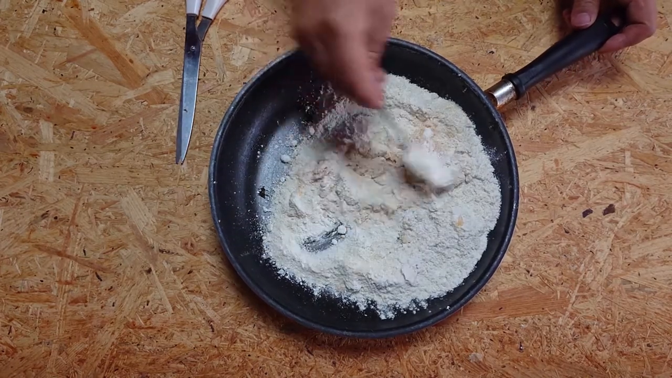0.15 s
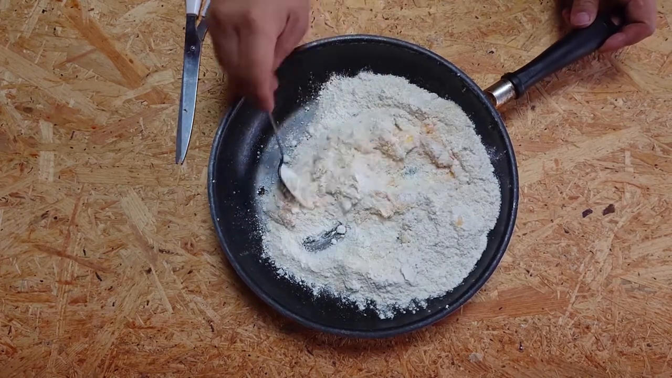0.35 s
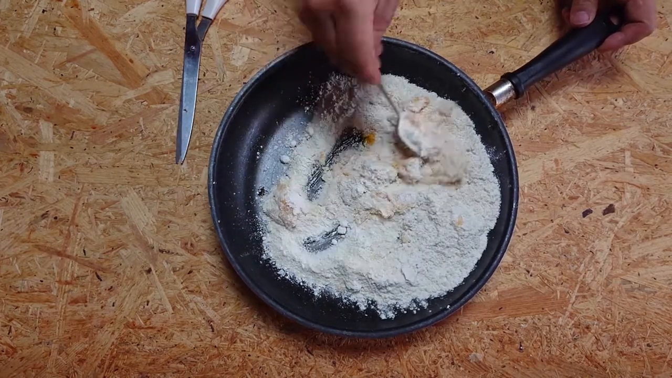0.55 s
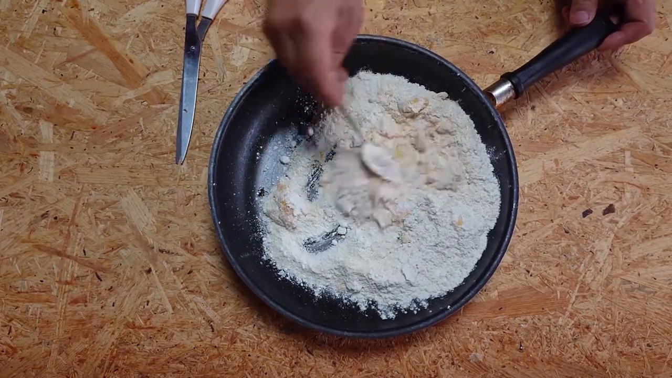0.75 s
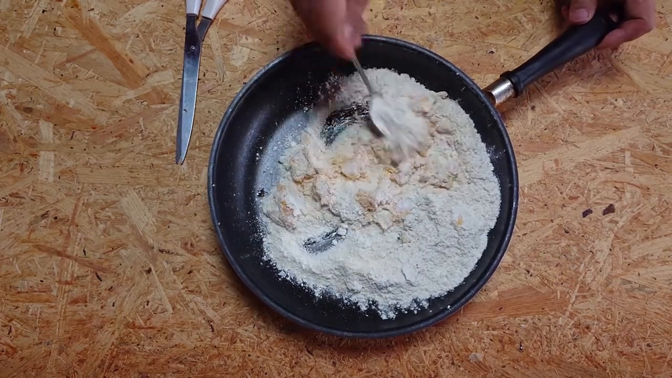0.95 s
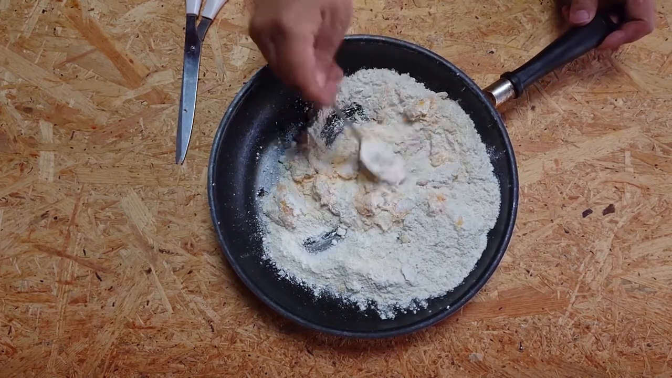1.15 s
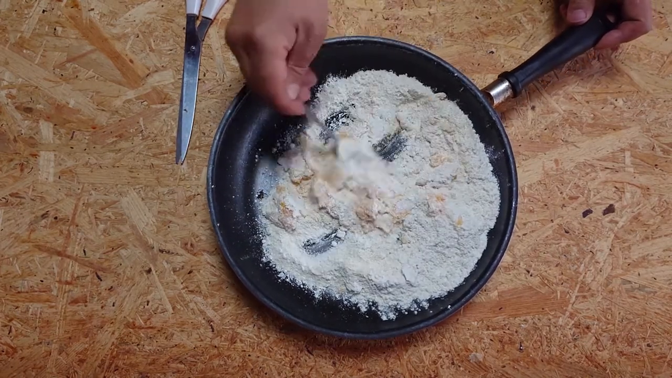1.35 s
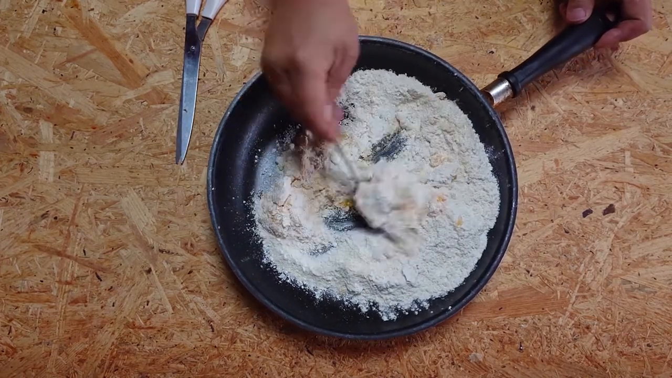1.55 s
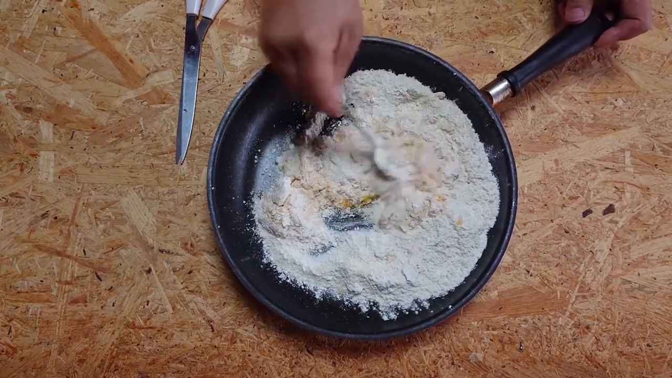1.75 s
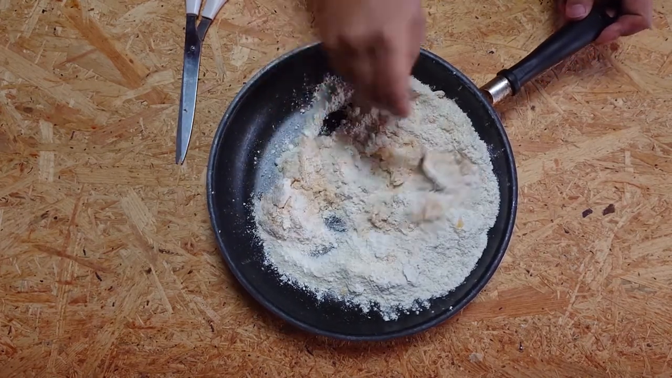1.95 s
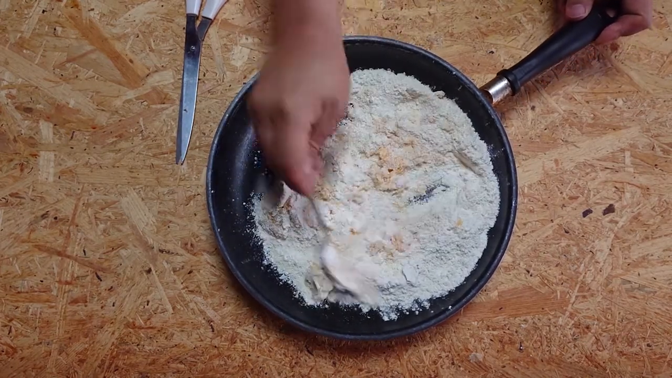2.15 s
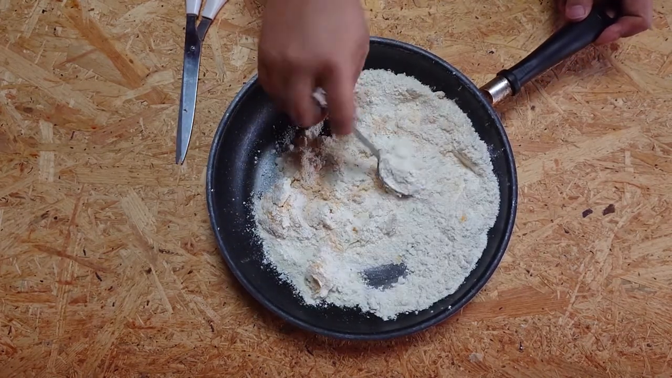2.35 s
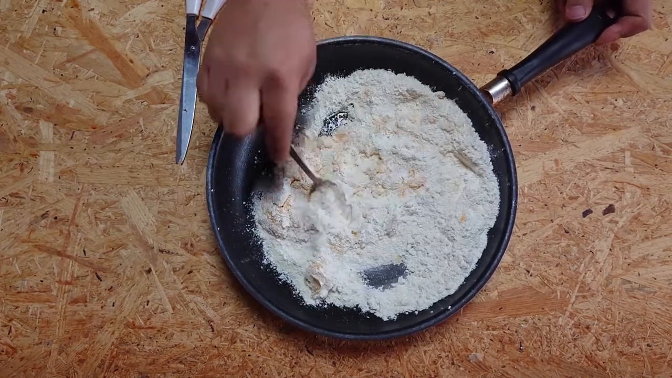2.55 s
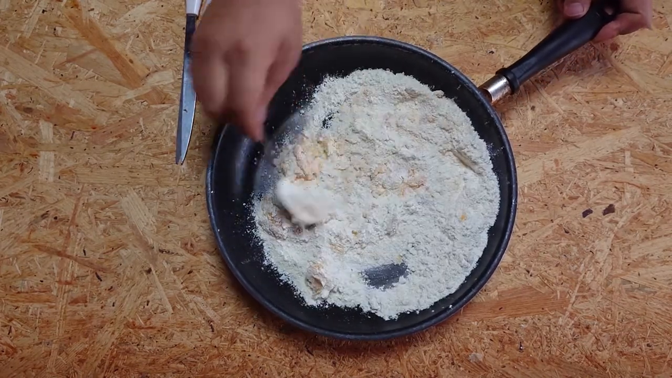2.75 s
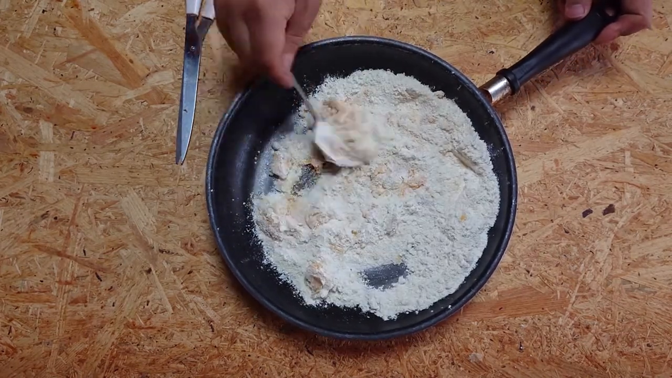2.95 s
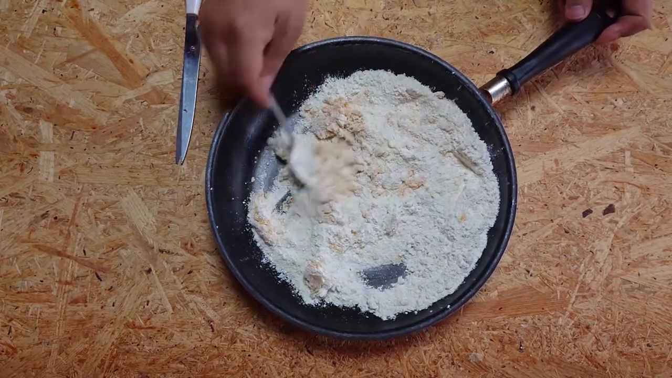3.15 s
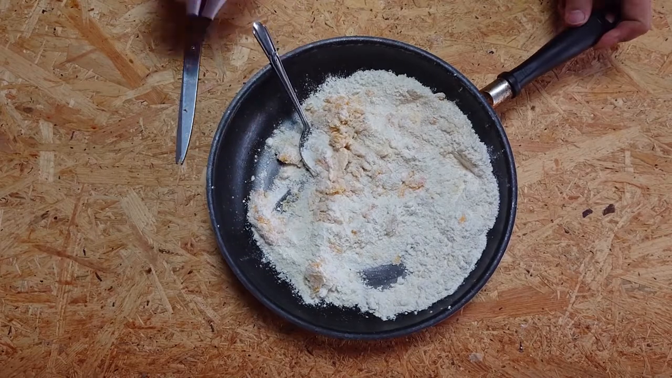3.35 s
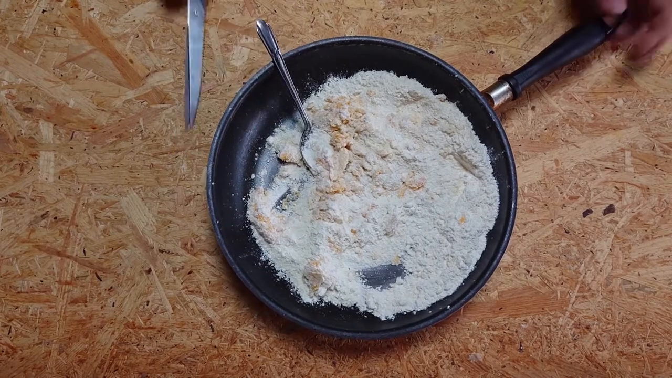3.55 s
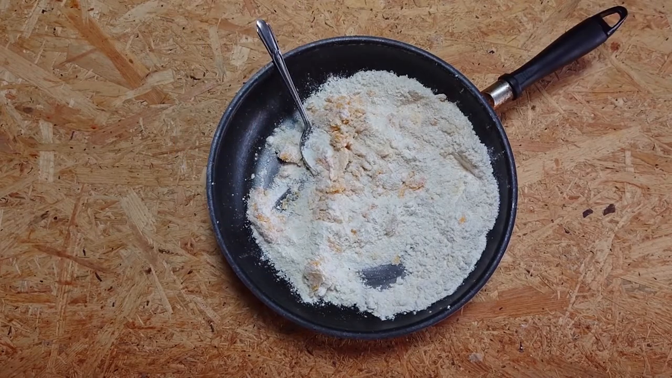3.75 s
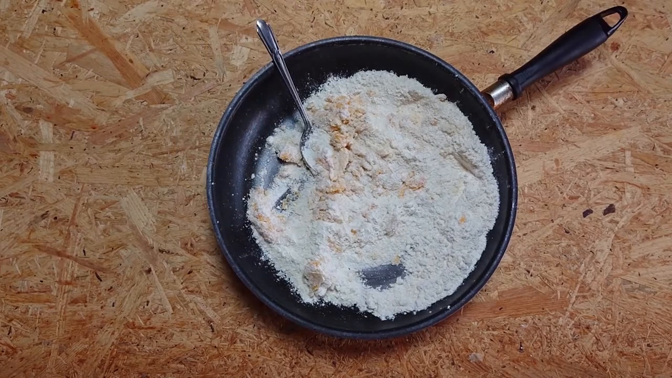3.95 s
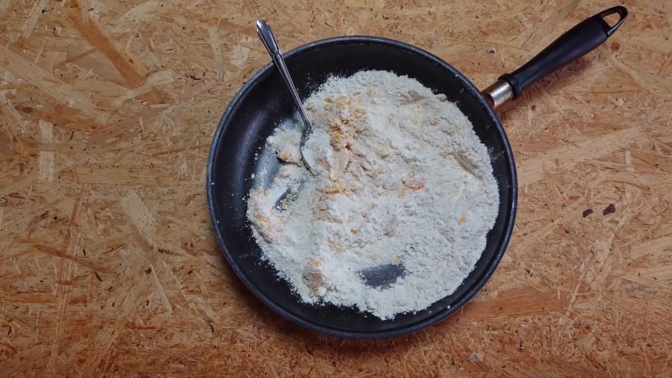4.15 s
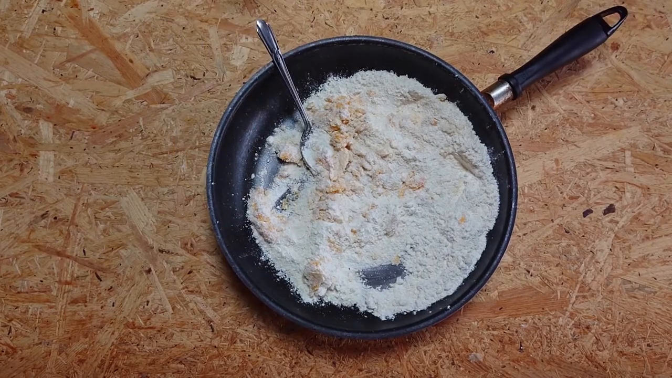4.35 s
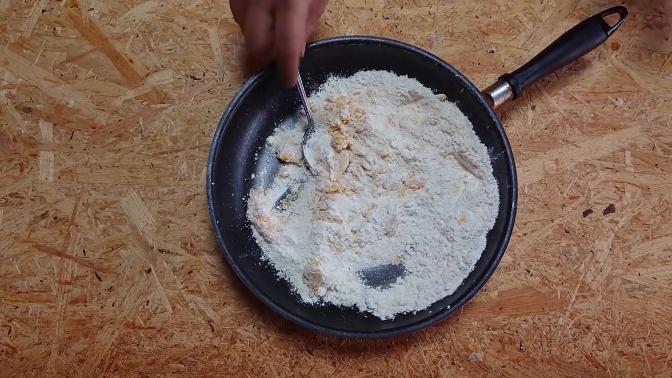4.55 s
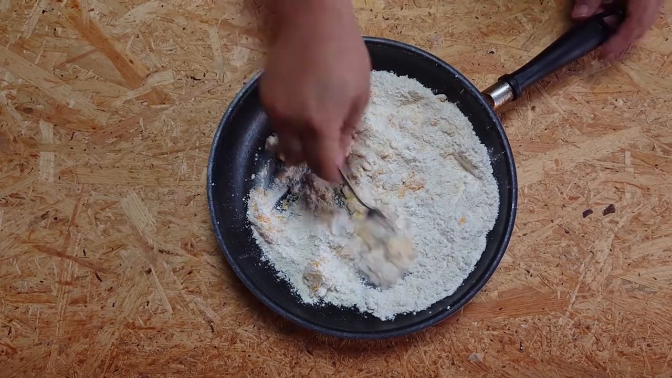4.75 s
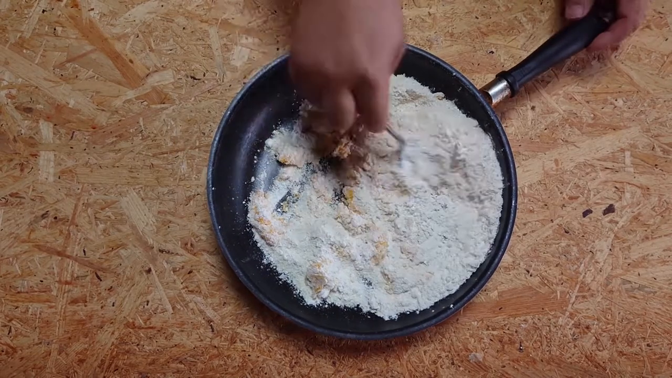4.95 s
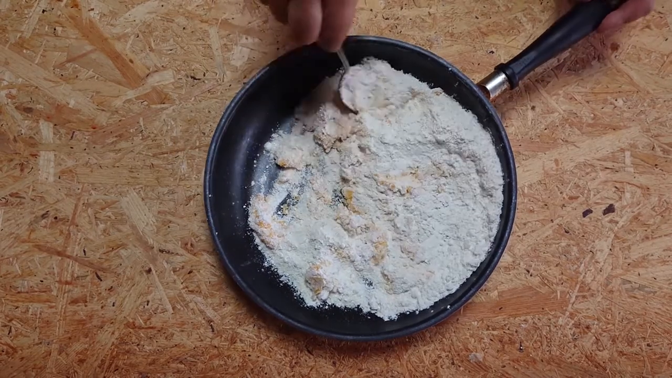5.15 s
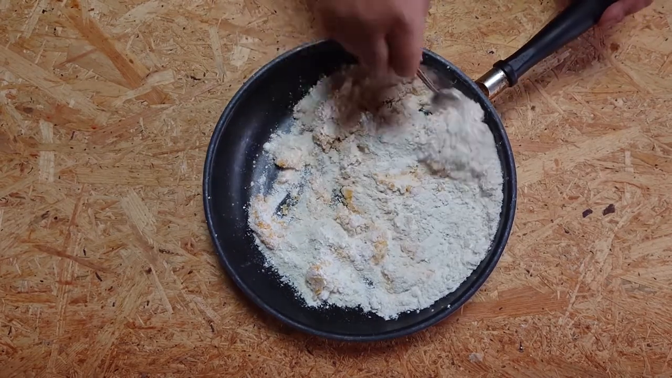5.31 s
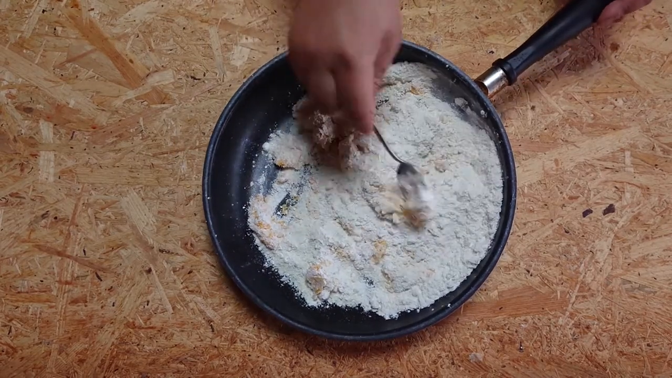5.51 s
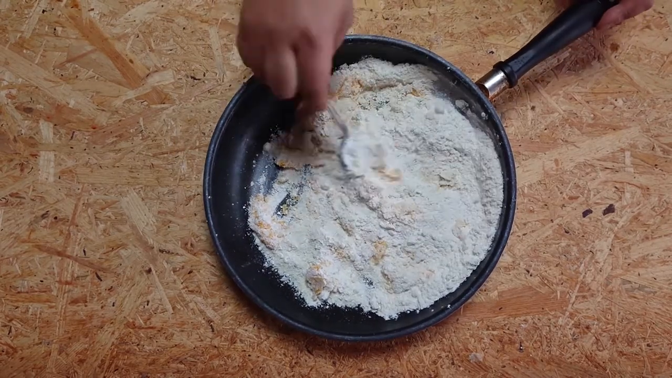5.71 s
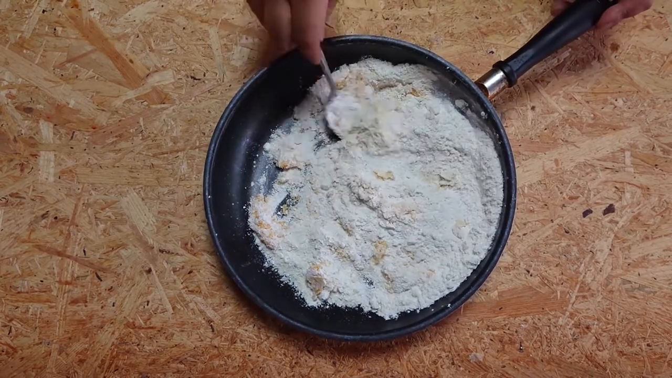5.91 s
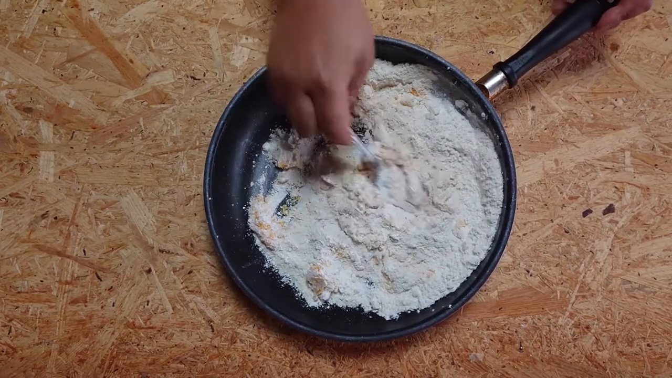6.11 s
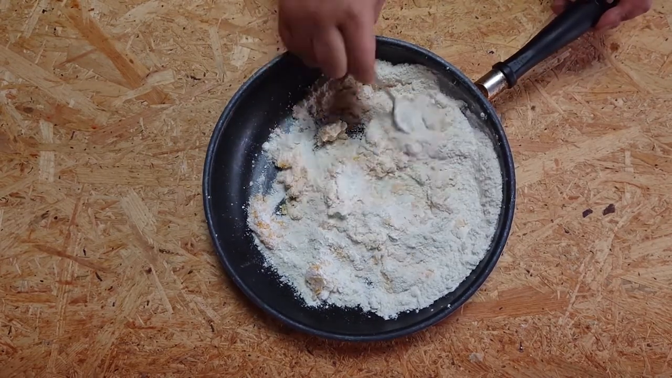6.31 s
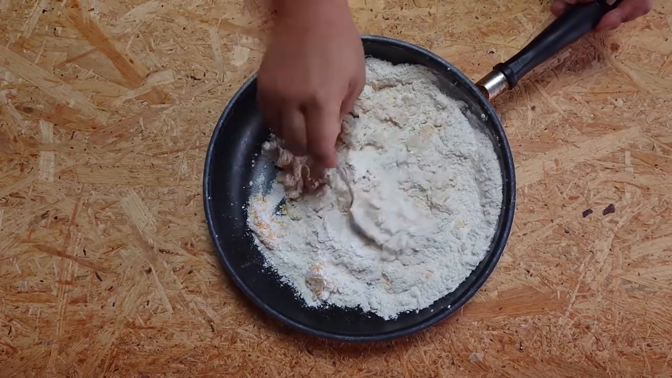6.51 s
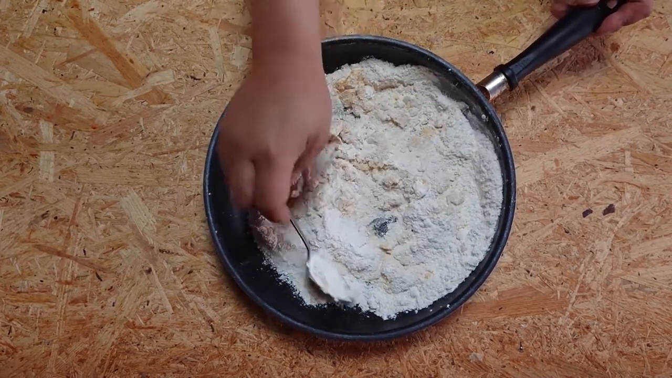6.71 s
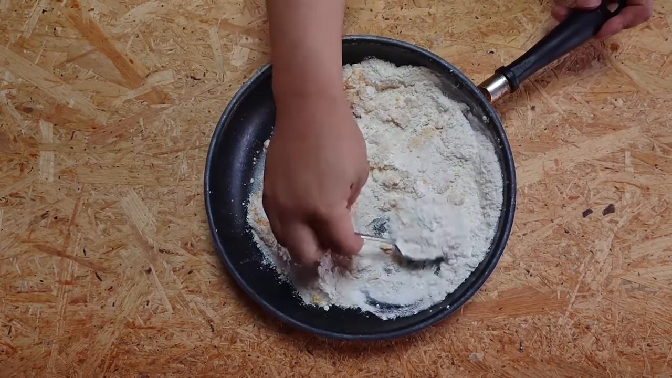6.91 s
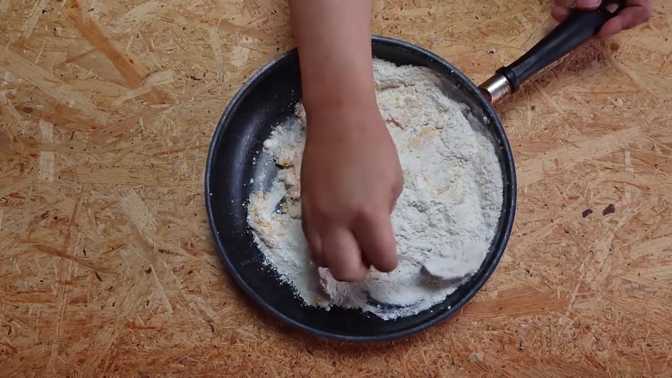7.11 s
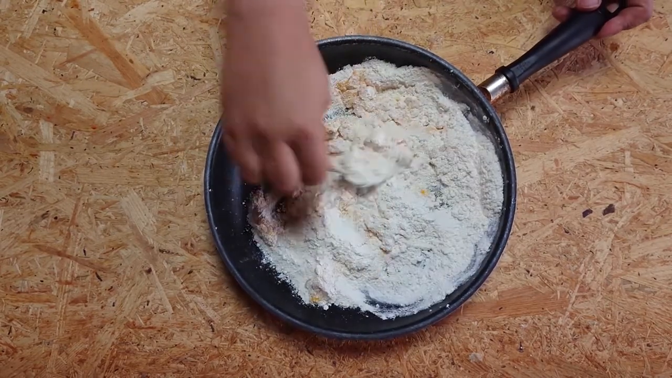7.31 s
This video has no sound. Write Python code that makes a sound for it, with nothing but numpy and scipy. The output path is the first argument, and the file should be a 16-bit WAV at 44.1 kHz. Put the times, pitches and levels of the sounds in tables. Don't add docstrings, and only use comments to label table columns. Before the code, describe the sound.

A metal spoon scrapes short gritty strokes through dry flour in a frying pan, with dull knocks on a wooden board over a low indoor hum.

```python
import sys
import numpy as np
from scipy import signal
from scipy.fft import rfft, irfft
from scipy.io import wavfile
from scipy.ndimage import uniform_filter1d

SR = 44100
rng = np.random.default_rng(int(sys.argv[2]) if len(sys.argv) > 2 else 0)


def invert_db(x):
    u = np.asarray(x, float) / 20
    return 10 ** u


def output_pcm(signal):
    pcm = np.clip(np.atleast_2d(signal).T, -1, 1) * 32767
    wavfile.write(sys.argv[1], SR, np.round(pcm).astype(np.int16))


N = 325017

# pitch_hz, level_db, t60_s
BOARD_MODES = [(135, -15.5, .12), (180, -16.5, 0.19), (325.2, -15, 0.091), (398, -12.5, 0.077),
               (504, -10, 0.092), (618, -8.5, 0.046), (843, -13.5, .06), (1211, -13.5, 0.029)]


def evened(x):
    return x / np.sqrt(np.mean(x ** 2) + 1e-20)


def read(points, hz):
    f, value = np.transpose(points)
    return np.interp(np.log(hz + 1), np.log(f + 1), value)


def add(mix, s, sound):
    part = mix[..., round(s * SR):][..., :sound.shape[-1]]
    part += sound[..., :part.shape[-1]]


def band(x, lo_hz, hi_hz):
    return signal.sosfilt(signal.butter(2, [lo_hz, hi_hz], "band", fs=SR, output="sos"), x)


def resonate(x, hz, width_hz):
    turn = np.exp(2j * np.pi * np.cumsum(hz) / SR)
    r = np.exp(-np.pi * width_hz / SR)
    return 2 * (turn * signal.lfilter([1 - r], [1, -r], x / turn + 1e-18)).real


def ring(hz, db, t60, phase, size=6000):
    t = np.arange(size)[:, None] / SR
    return (invert_db(db - 60 * t / t60) * np.sin(2 * np.pi * hz * t + phase)).sum(1)


def grit(size, per_s, spread_db):
    when, sign, how = rng.random((8000, 3)).T
    size_db = -spread_db * np.log(how + 0.012)
    clicks = (when < per_s / SR) * np.sign(sign - .5) * invert_db(size_db)
    return evened(clicks)[:size]


def hum():
    # freq_hz, level_db (per Hz)
    colour = [(25, -30), (45, -31), (65, -13.5), (100, -2.5), (130, -6.5), (250, -2.5), (400, -9),
              (650, -12), (1000, -16), (2000, -19), (5000, -25), (12000, -30), (15000, -33.5), (16000, -50)]
    # time_s, level_db
    traffic = [(0.0, 1), (0.8, -0.5), (1.5, 4), (2.05, -1.5), (3.2, 1), (3.5, 0.5), (4.2, -3.5),
               (4.5, -7.5), (4.9, 4.5), (5.25, -3.5), (6.0, -6.5), (7.37, -6.5)]
    # pitch_hz, width_hz, level_db
    drone = [(529, 21, -75.5), (153, 36, -75.5), (260, 19, -80)]
    # freq_hz, likeness (0-1)
    likeness = [(60, 0.59), (240, 0.88), (950, 0.59), (3770, 0.11), (15000, 0.016)]
    # freq_hz, left_minus_right_db
    balance = [(60, -2.5), (380, -2.0), (2380, -1.1), (15000, -1.5)]
    frames, hz = N // 1024 + 5, np.fft.rfftfreq(4096, 1 / SR)
    a, b, c, d, patches = rng.standard_normal((frames, 2049, 5)).T
    treble_swell = evened(uniform_filter1d(rng.standard_normal(frames), 5))
    patches = evened(uniform_filter1d(uniform_filter1d(patches, 30, 0), 3, 1))
    s, db = np.transpose(traffic)
    traffic_db = np.interp(np.arange(frames) * 1024 / SR, s, db)

    shape = invert_db(read(colour, hz))
    shape = shape / np.linalg.norm(shape) * invert_db(-62)
    tones = sum(invert_db(level) ** 2 / (1 + ((hz - f) / w) ** 4) for f, w, level in drone)
    shape = np.sqrt(shape ** 2 + tones)

    same = np.clip(read(likeness, hz), -1, 1)[:, None]
    left = a + 1j * b
    z = np.array([left, same * left + np.sqrt(1 - same ** 2) * (c + 1j * d)])
    z *= invert_db(np.outer([.5, -.5], read(balance, hz)))[:, :, None]

    share = np.clip(np.log2(hz / 700 + 1e-9), 0, 1)[:, None]
    level_db = (1 - share) * (0.22 + .25 * traffic_db) + share * 1.2 * treble_swell
    level_db = np.where(hz[:, None] < 110, 0.5 + traffic_db, level_db)
    z *= shape[:, None] * invert_db(level_db + (1.93 - share) * patches)
    return signal.istft(z, nperseg=4096, noverlap=3072)[1][:, :N]


def effort(rise, length):
    t = np.arange(0, length, 1 / SR)
    before = np.clip(1 - t / rise, 0, 1)
    after = np.clip((t - rise) / max(length - rise, .003), 0, 1)
    return t / length, -11.5 * before ** 1.61 - 22.5 * after ** 1.35


def pan_body(colour, lag_us, longer, size=130):
    # freq_hz, t60_s
    pan_t60 = [(1000, 0.11), (4000, 0.037), (15000, .04)]
    hz, t = np.fft.rfftfreq(128, 1 / SR), np.arange(size) * 32 / SR
    a, b, c, d = rng.standard_normal((len(t), len(hz), 4)).T
    same = np.clip(1.0 - hz / 16000, .3, 1)[:, None]
    right = a + 1j * b
    lag = np.exp(-2j * np.pi * hz * lag_us * 1e-6)[:, None]
    left = same * right * lag + np.sqrt(1 - same ** 2) * (c + 1j * d)
    fade_db = -60 * t / (longer * read(pan_t60, hz))[:, None]
    burst = signal.istft(np.array([left, right]) * invert_db(fade_db), nperseg=128, noverlap=96)[1]
    body = rfft(np.pad(burst, ((0, 0), (64, 0))))
    crowd = np.sqrt(uniform_filter1d(abs(body) ** 2, size=size // 4, axis=1))
    colour_db = read(colour, np.linspace(0, SR / 2, body.shape[1])) + [[-2.5], [0]]
    body = irfft(body / crowd * invert_db(colour_db))[:, 56:6500]
    return body / np.linalg.norm(body[1])


def dragged(drive, colour, lag_us, count=3):
    along = np.linspace(0, count - 1, len(drive))
    out = 0
    for k in range(count):
        part = drive * np.cos(np.pi / 2 * np.clip(along - k, -1, 1))
        out = out + signal.fftconvolve(part[None], pan_body(colour, lag_us, 0.7), axes=1)
    return out


def stroke(s, rise, length, press_db, bowl_hz):
    # time_s,
    # left_lag_us, brightness_db, depth_db, echo_hz
    places = [(0, -19, -7, -22, 4300), (0.475, 45, -2.5, -23, 4350), (0.98, 23, -5, -30, 4350),
              (1.4, 3, -8, -7, 4200), (1.615, 8, 1, -14, 3600), (2.03, -29, -3, -7, 6000),
              (2.28, 0.5, -3, -12, 4400), (3.24, 45, -6, -11, 4400), (4.3, -5, -5, 0.5, 4000),
              (4.81, -8, -9, -9.5, 4500), (5.26, -27, -5, -3.5, 3000), (5.405, -30, -12, -15, 3050),
              (5.99, 34, -6, -30, 6500), (6.64, -16, -4, -16, 2900), (6.89, 11, -5.5, -17, 3100),
              (7.2, -50, -4, -15, 3100)]
    # freq_hz, level_db (per Hz)
    scrape = [(410, -53), (700, -28.5), (1500, -19), (1850, -7.5), (2880, -3.5), (3640, -8), (4260, -4.5),
              (6150, -5), (6920, -10), (9600, -9), (10800, -17.5), (12600, -13), (16000, -20)]
    _, lag_us, bright_db, deep_db, echo_hz = min(places, key=lambda place: abs(place[0] - s))
    along, db = effort(rise, length)
    drive = grit(len(db), 6000, 4.9) * invert_db(press_db + db) * signal.windows.tukey(len(db), .04)
    low, high = band(drive, 426, 1890), band(drive, 4560, 20000)
    bowl = invert_db(5.5) * resonate(drive, np.full(len(db), bowl_hz), 860)
    deep = invert_db(deep_db + 21.5 + 3 * (along - .5))
    bright = invert_db(bright_db + 9 + 3 * (along - .5))
    drive = 0.85 * drive + 1.216 * bowl + low * (deep - 1) + high * (bright - 1)
    drive = drive - 0.55 * resonate(drive, np.full(len(db), echo_hz), 450)
    return s, dragged(drive, scrape, lag_us)


def knock(s, db, hz, t60, hard_db):
    f, level_db, decay = np.transpose(BOARD_MODES)
    chance = rng.random((len(f), 3)).T
    level_db = level_db + (hard_db + 9.5) * (f > 380) + 6.0 * (chance[0] - .5)
    board = ring(f * (.95 + 0.088 * chance[1]), level_db, decay, np.pi * (chance[2] > .5))
    main = ring(np.array([hz]), 0, max(t60, .02), 0)
    crowd = band(rng.standard_normal(6000) * invert_db(-60 * np.arange(6000) / SR / .11), 160, 700)
    blow = invert_db(-25.5) * grit(900, 400, 3.0) * np.exp(-np.arange(900) / 400)
    blow[0] = 1
    contact_s = 0.00092 * max(1.4 - 0.2 * (hard_db + 11), .2)
    u = np.arange(400) / SR / contact_s
    push = u * np.exp(-8 * u)
    out = signal.fftconvolve(main + board + invert_db(-10.0) * crowd, np.convolve(blow, push / push.sum()))
    clack = band(rng.standard_normal(1500) * np.exp(-np.arange(1500) / 250), 520, 2200)
    add(out, 0, invert_db(hard_db - 7.0) * clack)
    return s + .0015, -invert_db(db + 0.28) * out / abs(out).max()


def tick(s, db, hz):
    puff = rng.standard_normal(600) * np.exp(-np.arange(600) / 110)
    return s, invert_db(db - 0.5) * band(puff, .5 * hz, 2.0 * hz)


def tap():
    # pitch_hz, level_db, t60_s
    rim_modes = [(1350, -20.5, 0.2), (2126, -33.5, 0.73), (2980, -21.5, 0.16), (3300, -17, 0.13),
                 (4100, -25, 0.2), (5150, -28.5, 5.0), (7760, 1, 0.12), (8242, -14.5, 0.32),
                 (9140, -2.5, 0.17), (10040, -3.5, 0.17), (10440, -14.5, 0.084), (12470, -10, 0.09),
                 (14370, -9, 0.12), (15120, -22.5, 0.17)]
    # freq_hz, level_db (per Hz)
    wash = [(290, -42), (500, -16), (831, -19), (1320, -16.5), (3340, -12.5), (3810, -30), (4150, -11.5),
            (6330, -12.5), (9090, 8), (11100, -17), (12100, -7.5), (14700, -1), (16000, -30.5)]
    hz, db, t60 = np.transpose(rim_modes + rim_modes)
    twin = np.arange(len(hz)) >= len(rim_modes)
    hz = hz * (1 + 0.0074 * rng.standard_normal(len(hz)) * twin)
    turn = 2 * np.pi * rng.random(len(hz))
    t60 = np.clip(t60, .05, .14)
    rim = np.array([ring(hz, db - 29.5 - lean_db, t60, turn + skew * hz, size=14000)
                    for lean_db, skew in ((7.5, 0.00079), (-1.5, 0.0013))])
    add(rim, 0, invert_db(6.5) * pan_body(wash, 45, 2.5, size=260))
    blow = rng.standard_normal(400) * np.exp(-np.arange(400) / 30)
    crack = invert_db(-2) * band(blow, 8200, 12000)[None] * [[.7], [-1]]
    thud = invert_db(2.5) * band(band(np.arange(400) == 8, 900, 3200), 800, 3300)
    add(rim, 0, crack + thud)
    return 3.4015, rim


def slide(s, rise, length, shake_db, rasp_db):
    # freq_hz, level_db (per Hz)
    blades = [(290, -43), (500, -6), (545, -5), (843, -1), (974, -18), (1160, -14.5), (2430, -9),
              (2730, -12), (12700, -27.5), (16000, -30)]
    db = shake_db + effort(rise, length)[1]
    f, level_db, decay = np.transpose(BOARD_MODES)
    board = ring(f, level_db + 2.8 * np.log2(f / 300), 0.22 * decay, 0)
    slips = grit(len(db), 2000, 4.9) * invert_db(db - 5.0)
    shake = signal.fftconvolve(slips, board / np.linalg.norm(board))
    rasp = grit(len(db), 2500, 4.9) * invert_db(db + rasp_db)
    hinge = invert_db(4.5) * resonate(rasp, np.full(len(db), 1750.), 410)
    rasp = rasp + hinge + band(rasp, 3400, 20000) * (invert_db(3.5) - 1)
    out = dragged(rasp, blades, 59)
    add(out, 0, shake[None])
    return s, out


def room(x):
    # freq_hz, t60_s
    room_t60 = [(300, 0.22), (2000, 0.135), (12000, 0.14)]
    taps = np.zeros((2, SR // 2))
    at = np.arange(200, SR // 2 - 20, 20)
    at = at + rng.integers(0, 20, (2, len(at)))
    np.put_along_axis(taps, at, rng.choice([-1., 1.], at.shape), 1)
    hz, t, z = signal.stft(taps, SR, nperseg=256)
    tail = signal.istft(z * invert_db(-60 * t / read(room_t60, hz)[:, None]), SR, nperseg=256)[1]
    return signal.fftconvolve(x, tail / np.linalg.norm(tail[0]), axes=1)[:, :N]


def scene():
    # start_s, rise_s, length_s, peak_pressure_db, spoon_hz
    strokes = [(0.0, 0.00092, .03, -42, 4600), (0.474, .013, .035, -28, 3000), (0.49, .02, .07, -37, 3130),
               (0.977, .002, .05, -38.5, 2800), (0.985, .04, .07, -31.5, 3220),
               (1.611, .016, .095, -32, 2800), (2.034, .005, .02, -51, 3500),
               (2.279, .007, .045, -42, 3730), (4.809, .022, 0.082, -43.5, 2940),
               (4.86, 0.023, 0.094, -49, 2820), (5.405, .004, .075, -43, 4100),
               (5.444, .021, .042, -39.5, 2400), (5.992, .03, .052, -48, 2680),
               (6.637, .009, 0.027, -30.5, 4100), (6.655, 0.0076, 0.055, -42, 4050),
               (6.884, 0.015, 0.073, -50, 4400), (6.915, .05, .068, -47.5, 3700),
               (7.196, .003, .085, -45.5, 3570), (7.24, .037, .085, -43.5, 3850)]
    # start_s, rise_s, length_s, peak_pressure_db, spoon_hz
    brushes = [
        (1.4, .016, .035, -66, 2820),
        (2.469, .01, 0.036, -71, 3340),
        (3.233, 0.017, .04, -67.5, 2970),
        (4.275, .004, .025, -71, 1700),
        (4.365, .004, .03, -69, 2950),
        (5.253, .008, .028, -63.5, 2560),
        (5.951, .002, .06, -63, 2100),
    ]
    # time_s, blow_db, main_pitch_hz, t60_s, hardness_db
    knocks = [(0.303, -24, 262, 0.08, -10.5), (1.89, -53, 286, 0.051, -8.5), (2.058, -28, 245, 0.075, -13),
              (2.486, -53.5, 151, 0.055, -4), (2.788, -42.5, 173, 0.034, -10.5),
              (2.975, -43.5, 176, 0.085, -10), (3.4, -37, 248, 0.056, -12), (3.552, -36.5, 242, 0.1, -23),
              (3.601, -39, 261, 0.12, -12), (4.367, -52, 155, 0.058, -6), (4.801, -28, 446, 0.05, -10),
              (4.811, -33, 117, 0.065, -5), (5.013, -47.5, 247, 0.093, -11), (5.039, -55, 190, 0.043, -9),
              (5.074, -46, 472, 0.084, -4), (5.294, -35, 255, 0.054, -14), (5.7225, -40, 257.6, 0.07, -8),
              (5.96, -41.5, 228, 0.088, -11.5), (5.975, -41, 257, 0.11, -13.5),
              (6.846, -56, 170, 0.06, -14), (7.195, -43, 233, 0.061, -21)]
    # time_s, level_db, pitch_hz
    ticks = [
        (2.0384, -42.5, 1930),
        (3.3438, -78, 1580),
        (3.5468, -47, 1730),
        (3.5585, -47, 1750),
        (3.603, -44, 1600),
        (3.6481, -33, 1580),
        (3.664, -35, 2470),
        (3.8094, -65.5, 4600),
        (4.8643, -38, 3100),
        (5.7247, -56, 1900),
    ]
    # start_s, rise_s, length_s, shake_db, rasp_db
    pulls = [
        (3.543, 0.015, 0.067, -47, -15),
        (3.599, .01, .07, -46, -4),
        (3.64, .006, 0.032, -40.5, -5.5),
        (3.651, 0.018, .068, -39, -3.5),
    ]
    metal, wood = np.zeros((2, N)), np.zeros(N)
    floor = hum()
    for row in strokes + brushes:
        add(metal, *stroke(*row))
    for row in knocks:
        add(wood, *knock(*row))
    for row in ticks:
        add(wood, *tick(*row))
    add(metal, *tap())
    for row in pulls:
        add(metal, *slide(*row))
    near = metal + wood * invert_db([[-1.0], [.8]])
    near = signal.sosfilt(signal.butter(4, 115, "high", fs=SR, output="sos"), near)
    tail = room(near)
    bass = signal.sosfiltfilt(signal.butter(2, 600, fs=SR, output="sos"), tail[0] - tail[1])
    tail = tail - np.outer([.5, -.5], bass)
    return near + invert_db(-8) * tail + floor


def low_pass(x):
    return signal.sosfilt(signal.butter(12, 16580, fs=SR, output="sos"), x)


def record(dry):
    edge = signal.firwin(255, 16000, window=("kaiser", 8), fs=SR)
    mix = signal.oaconvolve(dry, edge[None], "same")
    return low_pass(mix)


dry = scene()
out = record(dry)
output_pcm(out)
```